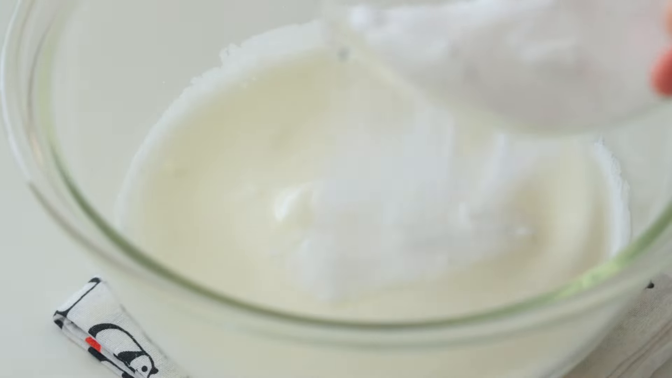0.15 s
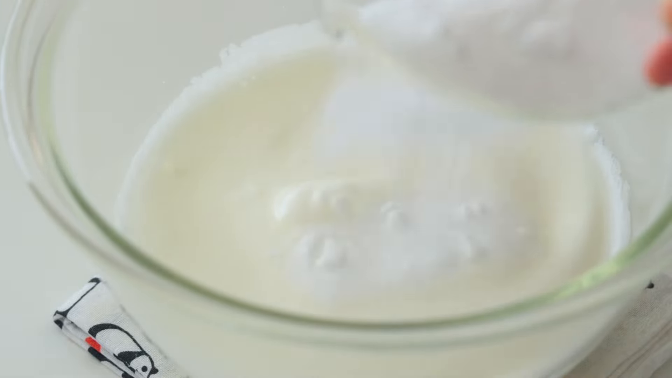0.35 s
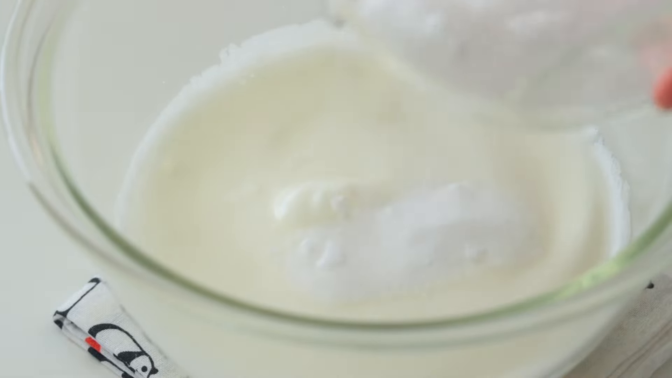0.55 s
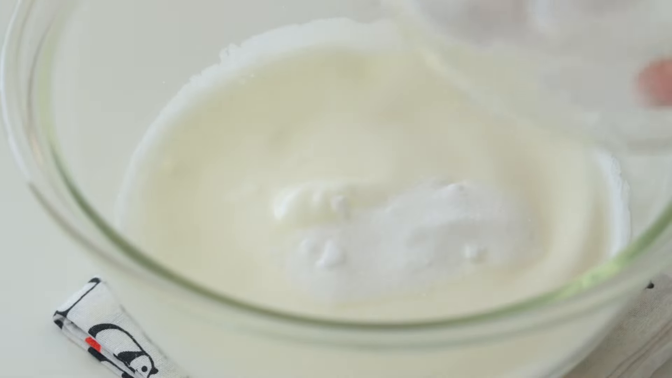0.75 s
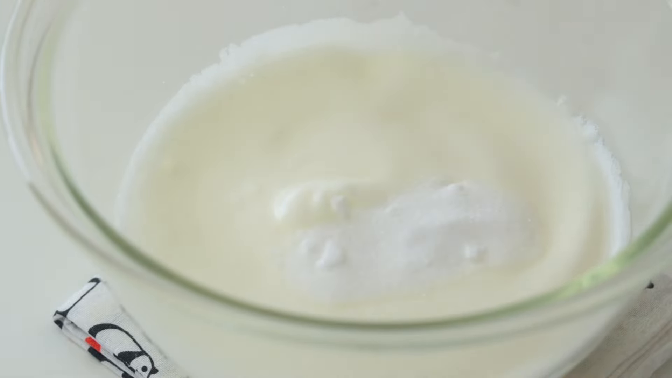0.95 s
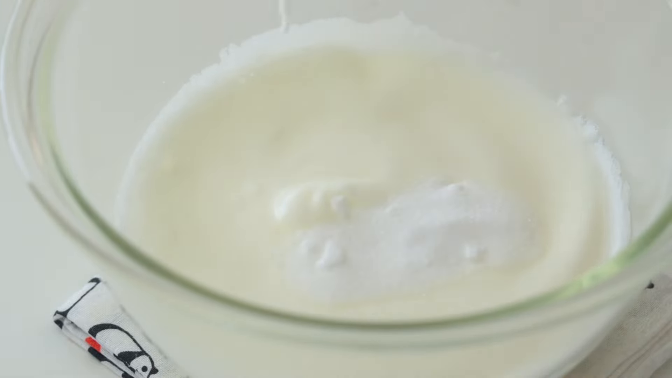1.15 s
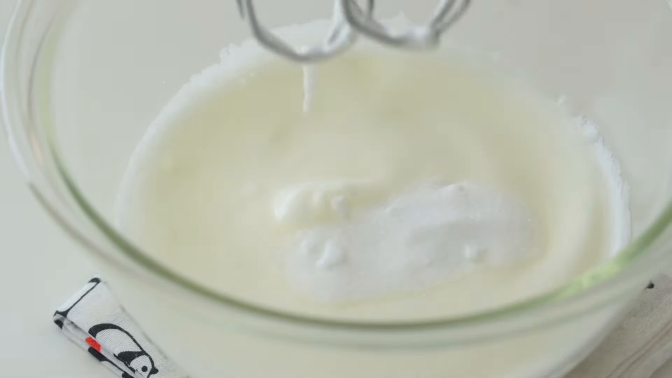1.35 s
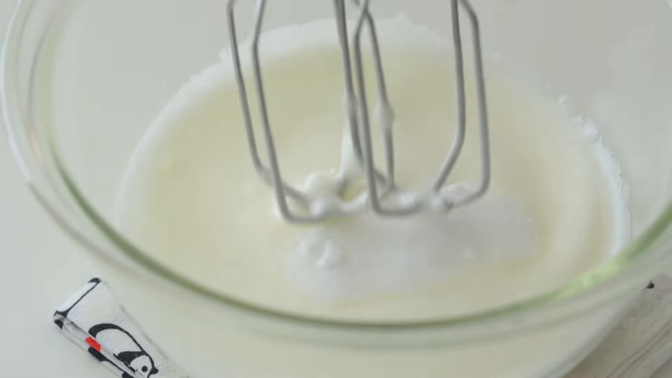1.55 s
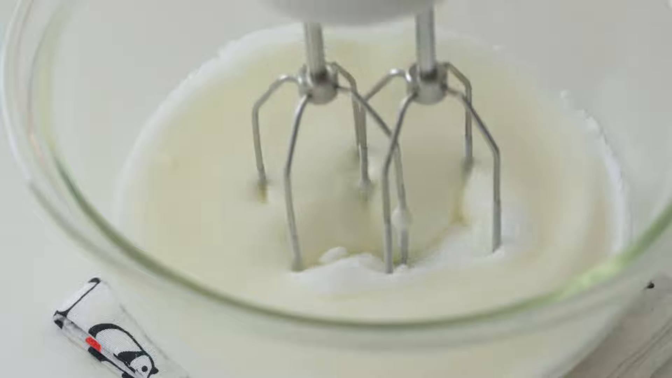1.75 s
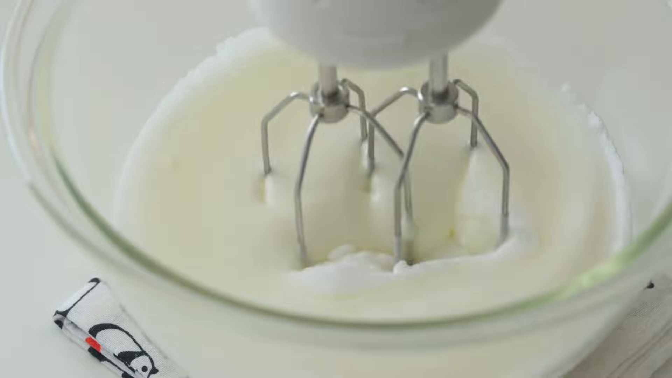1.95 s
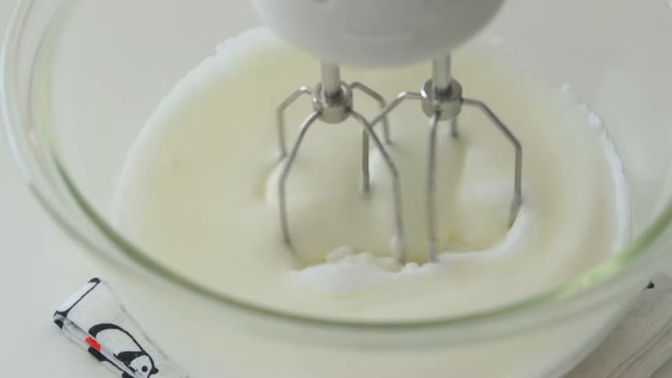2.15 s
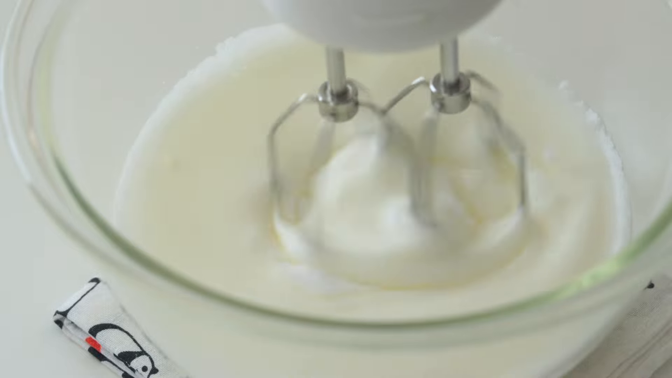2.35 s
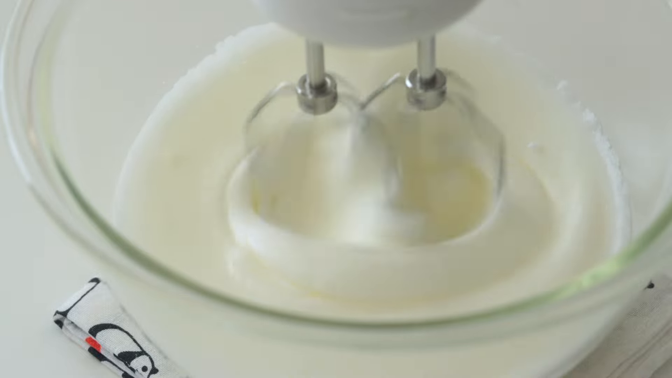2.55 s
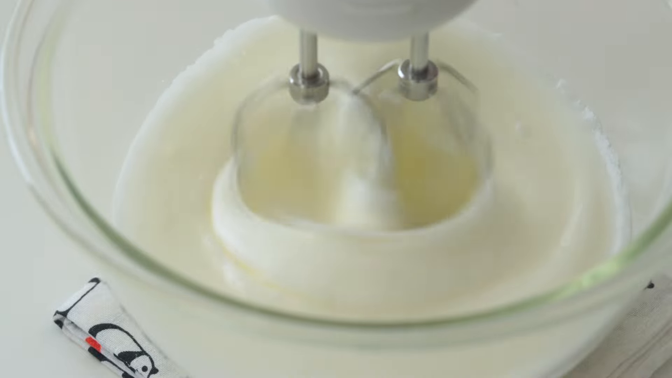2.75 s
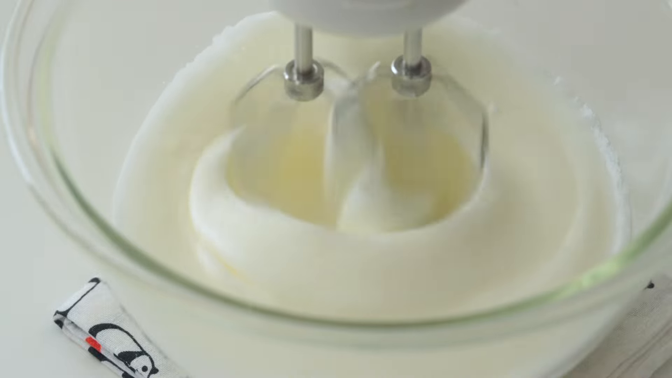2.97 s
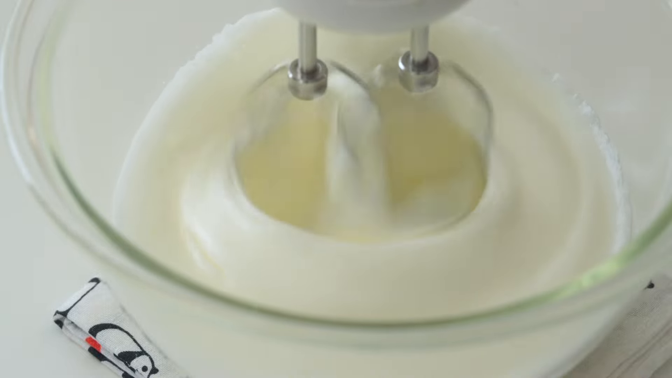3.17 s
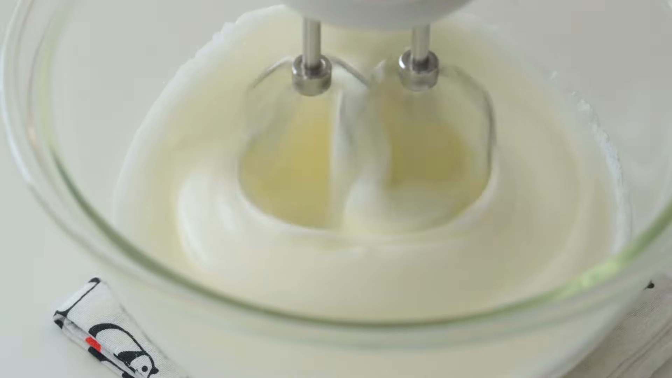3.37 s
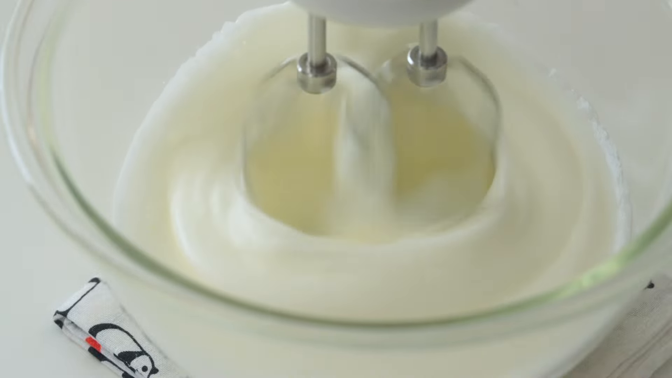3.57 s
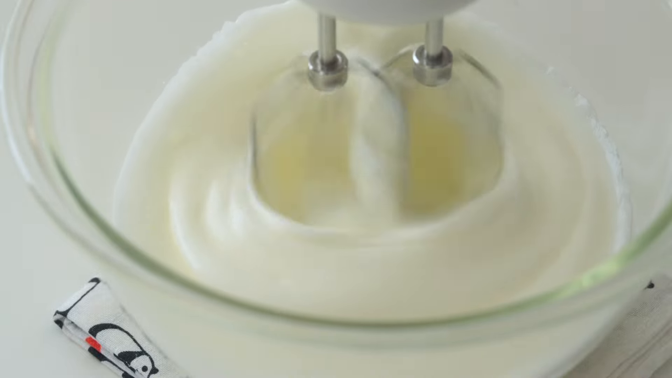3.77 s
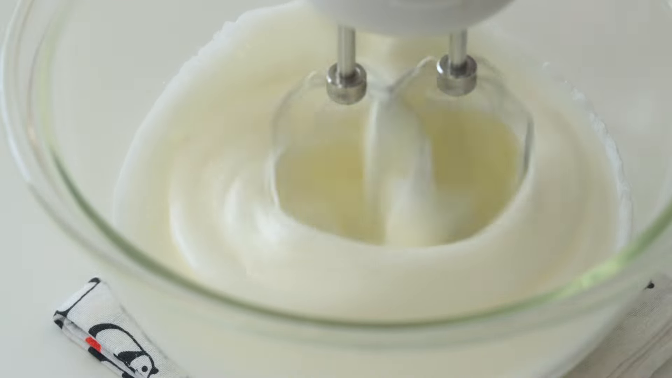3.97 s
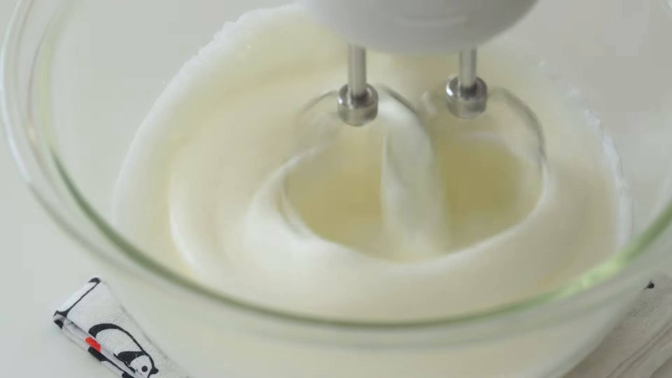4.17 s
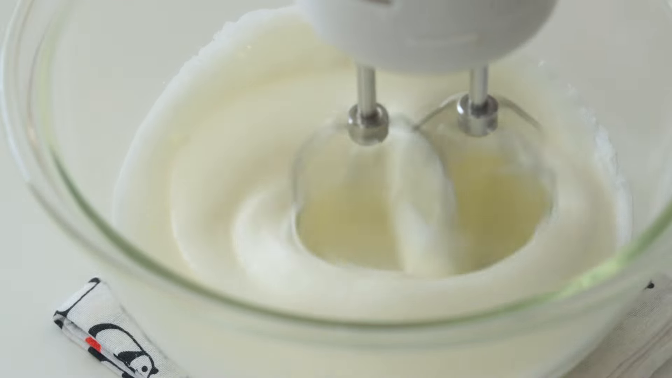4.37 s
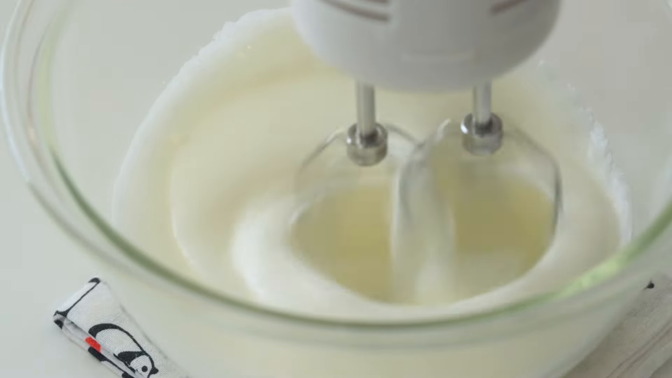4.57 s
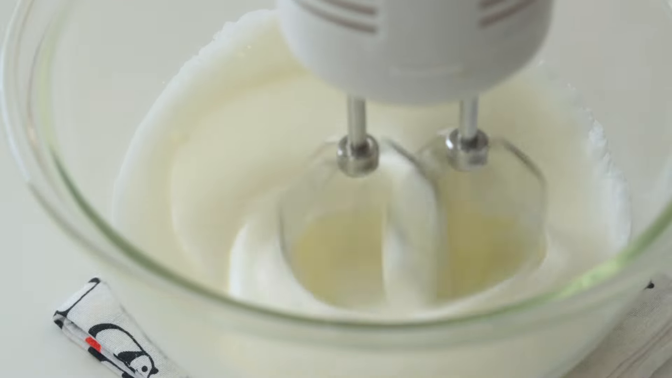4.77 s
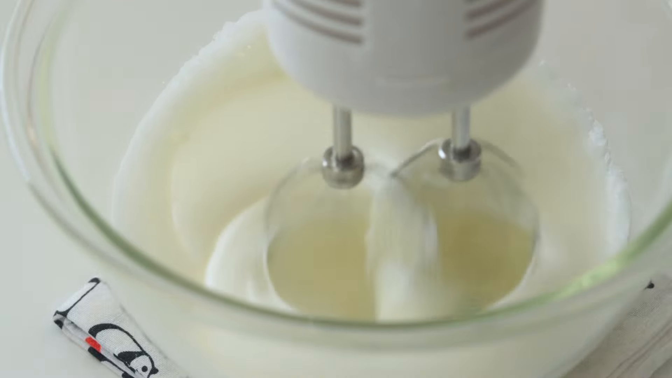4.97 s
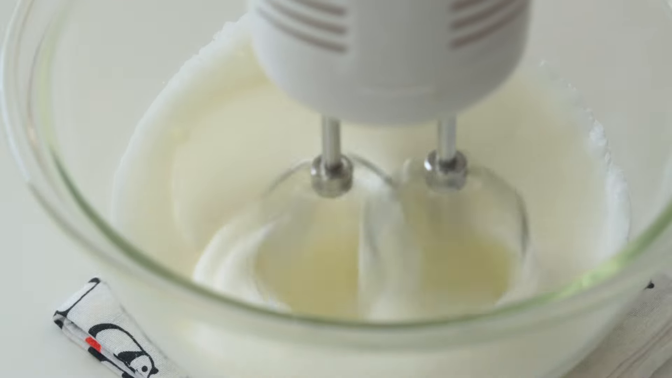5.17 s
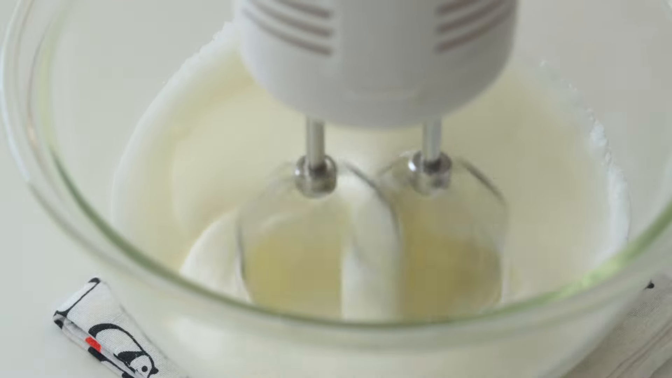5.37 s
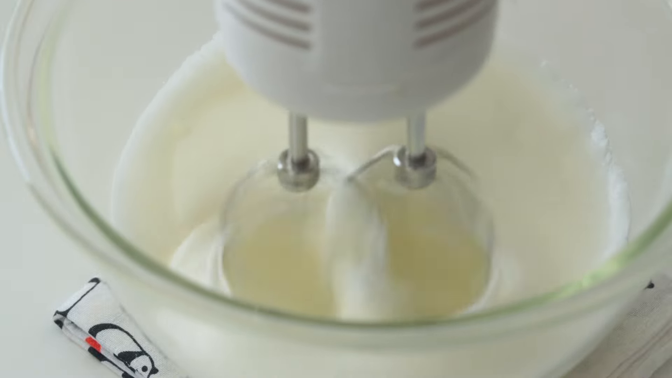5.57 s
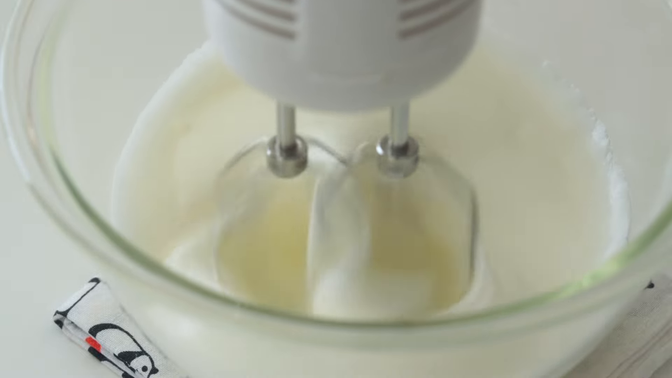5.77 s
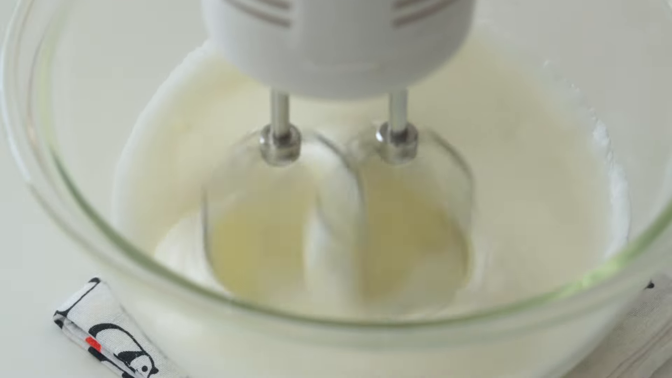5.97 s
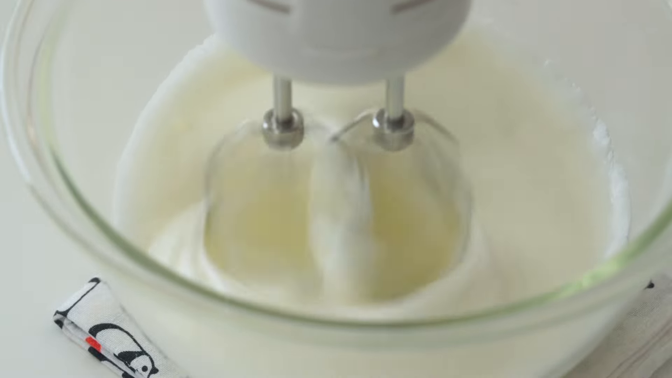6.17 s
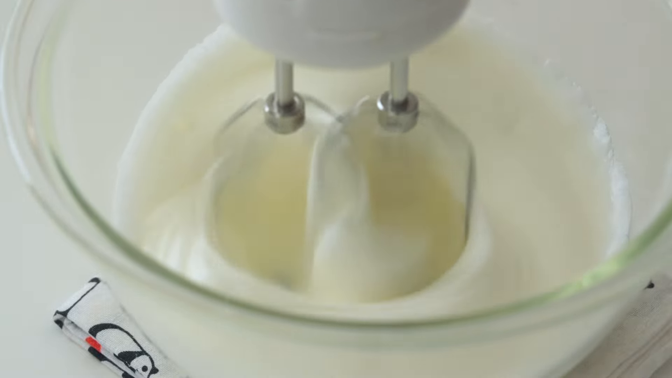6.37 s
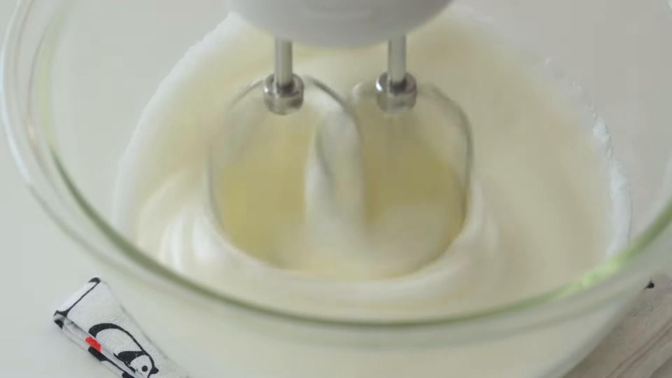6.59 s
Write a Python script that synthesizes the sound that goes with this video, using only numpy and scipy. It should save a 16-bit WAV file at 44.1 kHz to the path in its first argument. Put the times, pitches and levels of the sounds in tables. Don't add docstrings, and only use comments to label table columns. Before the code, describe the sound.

A quiet kitchen heard close up, with soft air noise and faint low appliance hum. From 0 to 0.5 s a cup is tapped quickly and unevenly, with bright clicks, small knocks and dull thuds over a thin trickle of sugar; the last tap is heavy. The trickle fades, and at 1.2 s the background abruptly becomes quieter. Around 1.5-1.9 s there is a faint rustle, then wire beaters tink brightly on glass at 1.87 s, with tiny bounces and a dull scuff. From 2.13 to 2.5 s sharp plastic switch snaps start the mixer: a stuttering growl, hard gear clacks, and a fast rising whine. Another snap at 3.04 s lifts it to full speed. Until 6.6 s it runs loud and steady, a buzzing, piercing whine with gear rattle, foam slosh and airy hiss, its tones gently swelling and fading, with one more click near 4.6 s.

```python
import sys
import numpy as np
from scipy import signal
from scipy.fft import rfft, irfft, next_fast_len
from scipy.io import wavfile
from scipy.ndimage import uniform_filter1d

SR = 44100
rng = np.random.default_rng(int(sys.argv[2]) if len(sys.argv) > 2 else 0)


def convert_level_to_amplitude(level_db):
    exponent = np.asarray(level_db, float) / 20
    return 10 ** exponent


def pcm_store(signal):
    levels = np.round(np.clip(np.atleast_2d(signal), -1, 1) * 32767)
    wavfile.write(sys.argv[1], SR, levels.astype(np.int16).T)


N = 292362
TIME = np.arange(N) / SR

# pitch in Hz, level in dB per Hz.
ROOM_AIR = [(50, -40), (85, -6), (144, -4.5), (209, -6), (290, -4.5), (377, -8), (502, -8), (1320, -17.5),
            (1470, -19), (4900, -24.5), (14700, -27), (16000, -29)]
# pitch in Hz, level in dB per Hz.
QUIET_AIR = [(50, -40), (85, -13), (290, -10.5), (353, -12), (403, -7), (560, -15.5), (906, -16.5),
             (2080, -24.5), (3530, -23), (6370, -31), (15000, -33), (16000, -33)]
ROOM_AIR_DB, QUIET_AIR_DB = -61, -72
CHANGE_S, CHANGE_DB = 1.206, -14
# pitch in Hz, level in dB.
HUM = [(53.8, -63), (145.3, -77.5), (242.2, -71.5), (290.7, -71.5)]
# time in seconds, level in dB.
POUR = [(0, -57), (.06, -73), (.1, -67), (.17, -68), (.3, -70), (.36, -64), (.42, -73), (.8, -78),
        (1.2, -70)]
FOAM_S, FOAM_RISE_S, FOAM_HOLD_S, FOAM_FALL_S, FOAM_DB = 1.49, 0.14, 0.14, 0.12, -76.5

# start in seconds, level in dB, pitch in Hz.
CUP_CLICKS = [(0.0014, -55, 3700), (0.0204, -48, 3690), (0.0334, -55, 2720), (0.1057, -47, 9860),
              (0.194, -44.5, 4440), (0.2094, -56.5, 3080), (0.246, -43, 4400), (0.3387, -46, 8450),
              (0.3538, -41, 4320), (0.3635, -37.5, 4390), (0.3708, -54, 3880), (0.495, -46, 3530),
              (1.2446, -61, 3680), (1.608, -63, 2610), (2.001, -53, 2340)]
# start in seconds, thud in dB, knock in dB, rim in dB, knock pitch in Hz.
KNOCKS = [(0.0014, -50.5, -51.5, -69, 633), (0.0334, -52, -60, -65, 514),
          (0.1054, -54, -56.5, -68, 479), (0.1931, -57, -53, -72, 412), (0.2091, -61, -50, -72, 610),
          (0.2132, -49, -45, -72, 420), (0.246, -61, -59, -64, 439), (0.3387, -45, -42, -54, 646),
          (0.3646, -56, -55, -66, 649), (0.3708, -47, -52, -66, 382),
          (0.4946, -39.5, -52.5, -51.5, 382), (1.608, -67, -64.5, -69, 431),
          (2.001, -63, -74, -69, 479), (2.0485, -75, -78, -63, 479), (2.1354, -60, -47.5, -55, 560)]

# start in seconds, peak in dB.
TINKS = [
    (1.8702, -42.5),
    (1.92, -61),
    (1.9455, -64),
    (2.0475, -58),
]
# pitch in Hz, level in dB, time to fade by 60 dB in seconds.
BEATER = [(3950, -6, 0.028), (4930, -4, 0.03), (5146, -5, 0.028), (7607, -24, 0.15), (8650, -5, 0.53),
          (9232, -13, 0.13), (9647, 2.5, 0.046), (11030, -9, 0.049), (11710, -5, 0.068), (13220, -14, 0.16)]
# time in seconds, level in dB.
SETTLE = [(1.862, -100), (1.872, -50), (1.9, -62), (1.95, -63), (2.0, -67), (2.04, -70), (2.1, -82)]
# time in seconds, level in dB.
RUMBLE = [(2.1, -66), (2.5, -60), (3.2, -51.5), (3.7, -63), (4.2, -53.5), (4.8, -51.5), (5.5, -48.5),
          (6.63, -50)]
# start in seconds, peak in dB, then body and jolt in dB relative to the peak.
SWITCH = [(2.1333, -33.5, -7, -27), (2.182, -28.5, -10, -39), (2.1884, -43, -12, -23),
          (2.275, -32, -18, -43), (2.2809, -18.5, -15, -47), (2.3003, -36, 5, -34), (2.32, -28, -8, -40),
          (2.397, -30, -9, -11), (2.5004, -19.5, -19, -38), (3.039, -23, -11, -25), (4.5697, -31, -6, -31)]

RIPPLE_HZ = 120
# time in seconds, shaft speed in Hz the motor heads for.
NOTCHES = [
    (2.134, 122),
    (2.3, 188),
    (2.3974, 228.5),
    (3.045, 259.3),
]
SPIN_UP_S = 0.225
ENGAGE_S, BREAK_S, BREAK_WIDTH_S = 2.14, 2.307, 0.085
STALL_DB = -4.5
# time in seconds, drag of the foam on the shaft in Hz.
HAND_DRAG = [(2.3, 0), (3.0, .9), (3.22, .4), (3.42, .3), (3.62, .7), (3.77, .9), (4.08, .2), (4.4, .5),
             (4.71, .7), (5.03, .7), (5.34, 1.2), (5.66, 1.1), (5.97, .7), (6.29, .4), (6.6, .4)]
# time in seconds, length in cm.
BOWL_PATH = [(2.3, 5.2), (3.0, 8.3), (3.22, 6), (3.42, 2.6), (3.62, 5.65), (3.77, 5.5), (4.08, 5.3),
             (4.4, 6.01), (4.71, 6.26), (5.03, 4.69), (5.2, 3.9), (5.34, 3.84), (5.5, 3.6), (5.66, 2.8),
             (5.97, 1.9), (6.29, 1.06), (6.6, .18)]

# pitch in Hz, gain in dB.
SHELL = [(1850, 2), (2165, 6), (2460, -5), (2570, -11), (2780, -2), (4250, 5.5), (5900, -7.5), (7700, 7.5),
         (8700, 7.5), (13500, 6.5)]
# pitch in Hz, width in Hz, gain in dB.
PANELS = [(970, 77, -3), (1220, 90, 3), (1350, 40, -12), (1660, 170, 3), (1915, 52, -14), (2420, 35, -12),
          (2794, 46, 2), (3063, 19.4, -7), (3135, 22, -8), (3420, 157, 4.5), (4493, 100, -13),
          (5470, 70, -10), (5740, 39, -8), (8200, 150, -10)]
# pitch in Hz, width in Hz, level in dB.
HOUSING = [(362, 40, -3), (622, 73, -1.5), (740, 82, 1.5), (850, 40, 0), (982, 60, -7), (1263, 72, 2.5),
           (1390, 98, 3), (1492, 73, 6), (1662, 54, 3), (2050, 150, -2.5), (2600, 390, -13.5)]

UNBALANCE_DB, UNBALANCE_DB_PER_DECADE = -45.5, 16
BARS_DB = [-39, -37.5, -43, -44.5, -48, -58]
BARS_START_DB, SIDES_DB_PER_DECADE = -25, 8
MIRRORS = [(0.58, 0.76), (0.6, 0.34), (0.65, .304), (0.07, 0.32), (0.03, .013), (0.42, 0.068)]
BOUNCES = [2, 1, 1, 1, 1, 1]
MIRROR_HZ = 2950
TABLE_M, TABLE_SHARE, TABLE_TURNS = 0.46, 0.256, 0.379
RADIATES_HZ = 1010
VENT_HZ, VENT_WIDTH_HZ, VENT_DB = 12600, 470, 10.5
# pitch reached in Hz, level in dB.
UPPER_BARS = [(3000, -66), (7000, -66), (10000, -61), (13000, -51.5), (14500, -66), (15500, -62),
              (16200, -110)]
ORDERS = [(0, 3), (2, 0), (5, 0), (8, 0), (10, 0), (11, -2), (11, -1), (12, -2), (12, 2), (13, -1), (13, 0),
          (14, 0), (16, 0), (18, 0), (24, -1), (24, 1), (32, 0), (33, 0), (35, 0), (36, -1), (36, 1),
          (37, 0), (38, 0), (41, 0), (42, 0), (47, 0), (48, -1), (49, 0), (3, 0), (20, 0), (23, 0),
          (14, -1)]
ORDERS_DB = [-60.5, -58, -51, -54, -55.5, -56, -55, -52, -56, -52.5, -53.5, -56, -55.5, -54.5, -61.5, -58,
             -67, -60, -53, -54, -50.5, -60, -62, -58, -62, -54, -55, -56, -59.5, -67, -66, -63]
# time in seconds, left minus right in dB.
SHRILL = [(3.4, -2), (3.57, -15), (3.79, -1), (3.91, -7), (4.1, 1), (4.28, -7), (4.5, -2), (4.77, -12.0),
          (5.42, -13), (5.64, 1), (5.94, 0.0), (6.21, -14), (6.63, -1)]
SHRILL_LEAD = 0.95

# full speed in dB, dB per decade of speed, change at the start in dB, jerk in dB.
LAYERS = [
    (2, 19.5, 1, -2.5),
    (-0.53, 14.5, 4.5, 13),
    (0.95, 27, 5, 10.5),
    (0.6, 25, -15, 8),
]
LOCK_DB, LOCK_WIDTH_HZ = 4, 7
# pitch in Hz, level in dB per Hz.
SLOSH = [(40, -100), (70, -96), (170, -78.5), (300, -84.5), (600, -76), (950, -86), (1500, -80),
         (2050, -76), (2400, -81.5), (3000, -85.5), (4000, -110)]
# pitch in Hz, level in dB per Hz.
BRUSH = [(1500, -110), (2400, -80), (3200, -79), (3800, -84), (4250, -80.5), (4900, -83.5), (5600, -89.5),
         (6500, -91.5), (7500, -110)]
# pitch in Hz, level in dB per Hz.
FAN = [(5500, -110), (7300, -87.5), (8400, -80.5), (9700, -80), (11100, -85.5), (12800, -82), (13400, -91),
       (14500, -97), (15700, -99), (16000, -130)]
# start in seconds, peak in dB.
CLACKS = [(2.209, -34), (2.226, -33), (2.236, -33), (2.242, -30), (2.251, -34), (2.301, -25), (2.326, -20),
          (2.333, -25), (2.366, -26), (2.375, -31), (2.384, -27), (2.433, -27), (2.706, -29), (2.731, -30),
          (2.756, -30), (2.781, -31), (2.814, -33), (2.847, -29), (2.879, -30), (2.915, -33), (2.964, -32),
          (3.015, -27), (3.116, -30), (3.279, -28), (3.546, -30), (4.556, -25)]

# pitch in Hz, left minus right in dB.
PORTS = [(60, -2.0), (110, -2.5), (200, -3.5), (380, -2.5), (700, -2.0), (1290, -0.5), (2380, -2.5),
         (4400, -1.0), (8120, 0.0), (15000, -4.0)]
# pitch in Hz, gain in dB.
PORT_DIP = [(100, 0), (4600, -0.5), (6300, -4.5), (8000, -0.5), (12000, -3), (15800, 1), (16500, -30)]
# pitch in Hz, gain in dB.
ECHO_COLOUR = [(100, 0.5), (1000, -1.5), (2500, 1.5), (5000, 3), (9000, 1.5)]
ECHO_T60_S, ECHO_DB = 0.44, -10.5


def colour(x, points):
    size = next_fast_len(N)
    hz, db = np.transpose(points)
    bins_hz = np.arange(size // 2 + 1) * SR / size
    gain = convert_level_to_amplitude(np.interp(np.log(bins_hz + 1), np.log(hz), db))
    return irfft(rfft(x, size) * gain, size)[..., :N]


def hiss(points):
    return colour(rng.standard_normal(N), points) * np.sqrt(SR / 2)


def walk(rate):
    size = int(SR / rate)
    steps = np.repeat(rng.standard_normal(N // size + 1), size)
    drift = uniform_filter1d(steps, size)[:N]
    return drift / drift.std()


def curve(table):
    s, value = np.transpose(table)
    return np.interp(TIME, s, value)


def add(out, s, x):
    i = int(s * SR)
    out[i:i + len(x)] += x[:N - i]


def ring(hz, t60, rough=0., rise_s=0.00015):
    t = np.arange(int(t60 * SR) + 8) / SR
    grit = signal.lfilter(*signal.iirpeak(hz, 2.2, SR), rng.standard_normal(len(t)))
    fade = (1 - np.exp(-t / rise_s)) * np.exp(-np.log(1000) * t / t60)
    return fade * (np.sin(2 * np.pi * hz * t) + rough * grit / grit.std())


def room_air(points, db, width):
    mid = convert_level_to_amplitude(0.57 * walk(7.8)) * hiss(points)
    side = convert_level_to_amplitude(0.57 * walk(7.8)) * hiss(points)
    return np.array([mid + width * side, mid - width * side]) * convert_level_to_amplitude(db) / mid.std()


def kitchen():
    after = np.interp(TIME, [CHANGE_S - 0.004, CHANGE_S + 0.004], [0, 1])
    out = (1 - after) * room_air(ROOM_AIR, ROOM_AIR_DB, 0.78) + after * room_air(QUIET_AIR, QUIET_AIR_DB, 0.43)
    drift = np.cumsum(1 + 0.0197 * walk(4.7)) / SR
    for hz, db in HUM:
        hum = np.sqrt(2) * convert_level_to_amplitude(db + 2.0 * walk(5.05)) * np.sin(2 * np.pi * hz * drift)
        out += hum * convert_level_to_amplitude(CHANGE_DB * after)
    grains = hiss([(2500, -6), (4000, -1.5), (6000, -10), (9000, -2), (12000, -4), (15000, -33)])
    foam = np.interp(TIME, np.cumsum([FOAM_S, FOAM_RISE_S, FOAM_HOLD_S, FOAM_FALL_S]), [0, 1, 1, 0])
    rustle = (1 - after) * convert_level_to_amplitude(curve(POUR)) + foam * convert_level_to_amplitude(FOAM_DB)
    return out + grains / grains.std() * rustle * convert_level_to_amplitude(1.5 * walk(40.2))


def taps():
    out = np.zeros(N)
    for s, db, click_hz in CUP_CLICKS:
        add(out, s, convert_level_to_amplitude(db - 5.0) * ring(click_hz, 0.014, rough=0.91))
        add(out, s, convert_level_to_amplitude(db - 17.5) * ring(9900, 0.016, rough=2.7))
    for s, thud_db, knock_db, rim_db, knock_hz in KNOCKS:
        add(out, s, convert_level_to_amplitude(rim_db + 8.0) * ring(1470, 0.016, rough=0.27))
        add(out, s, convert_level_to_amplitude(knock_db + 7.5) * ring(knock_hz, 0.017, rough=0.36))
        add(out, s + 0.0019, convert_level_to_amplitude(thud_db) * ring(162, 0.11, rise_s=0.0015))
    return out


def tinks():
    out = np.zeros(N)
    for s, db in TINKS:
        for hz, mode_db, t60 in BEATER:
            strength = convert_level_to_amplitude(db + mode_db - 13.0 + 2 * rng.standard_normal())
            add(out, s, strength * ring(hz, min(t60, 0.09), rough=0.31))
        add(out, s, convert_level_to_amplitude(db - 23) * ring(1540, 0.017, rough=2.1))
        add(out, s, convert_level_to_amplitude(db - 8.0) * ring(810, 0.03, rough=0.4))
    scuff = hiss([(30, -22), (60, 3), (160, -4.5), (400, -13), (800, -29), (2000, -48)])
    return out + convert_level_to_amplitude(curve(SETTLE) + 2.5 * walk(30.1)) * scuff / scuff.std()


def rumble():
    shake = hiss([(30, -39), (50, -14), (70, -5.5), (100, -10), (140, -31), (250, -44)])
    return convert_level_to_amplitude(curve(RUMBLE) + 2 * walk(6)) * shake / shake.std() * np.array([[0.7], [-1.2]])


def switch():
    snap, body = np.zeros((2, N))
    for s, db, body_db, jolt_db in SWITCH:
        add(snap, s, convert_level_to_amplitude(db - 16) * ring(9200, 0.019, rough=4.5))
        add(body, s, convert_level_to_amplitude(db + body_db - 7.5) * ring(1766, 0.032, rough=2.6))
        add(body, s, convert_level_to_amplitude(db + jolt_db + 3.0) * ring(152, 0.08, rise_s=0.003))
    plastic = [(2500, -1), (4800, 6.5), (6300, -5.0), (9000, -1.0), (12000, -3.0), (15000, -7), (16500, -30)]
    return colour(snap, plastic) + body


def shaft():
    s, hz = np.transpose(NOTCHES)
    goal = np.r_[0, hz][np.searchsorted(s, TIME)]
    keep = np.exp(-1 / (SPIN_UP_S * SR))
    return np.maximum(signal.lfilter([1 - keep], [1, -keep], goal) - curve(HAND_DRAG), 8)


def shell(hz):
    shell_hz, shell_db = np.transpose(SHELL)
    broad = np.interp(np.log(hz + 1), np.log(shell_hz), shell_db)
    return broad + sum(db * np.exp(-((hz - centre_hz) / width) ** 2) for centre_hz, width, db in PANELS)


def bar_levels(shaft_hz, waiting):
    path_s = curve(BOWL_PATH) / 34300
    speed = np.log10(shaft_hz / shaft_hz.max())
    main = [(12, -1), (12, 0), (12, 1), (24, 0), (36, 0), (48, 0)]
    levels = [UNBALANCE_DB + UNBALANCE_DB_PER_DECADE * speed]
    for (order, ripple), db, (share, phase), bounces in zip(main, BARS_DB, MIRRORS, BOUNCES):
        hz = np.abs(order * shaft_hz + ripple * RIPPLE_HZ) + 1
        bowl_share = share * np.minimum(hz / MIRROR_HZ, 1) ** 3
        mirror = np.abs(1 + bowl_share * np.exp(2j * np.pi * (hz * path_s * bounces + phase)))
        mirror *= np.abs(1 + TABLE_SHARE * np.exp(2j * np.pi * (hz * TABLE_M / 343 + TABLE_TURNS)))
        level = db + shell(hz) + abs(ripple) * SIDES_DB_PER_DECADE * speed
        level += VENT_DB / (1 + ((hz - VENT_HZ) / VENT_WIDTH_HZ) ** 2)
        level -= 20 * np.log10(1 + (RADIATES_HZ / hz) ** 2)
        level += 20 * np.log10(mirror) + BARS_START_DB * waiting
        levels.append(level)
    return levels


def tone(turns, order, ripple, db, flutter_db, lead=0.):
    phase = 2 * np.pi * (order * turns + ripple * RIPPLE_HZ * TIME + rng.random())
    return np.sqrt(2) * convert_level_to_amplitude(db + flutter_db * walk(45)) * np.sin(phase + lead)


def whine(turns, shaft_hz, levels):
    main = [(1, 0), (12, -1), (12, 0), (12, 1), (24, 0), (36, 0)]
    speed = np.log10(shaft_hz / shaft_hz.max())
    flutter_db = 0.7 + 3 * (1 - shaft_hz / shaft_hz.max())
    shake_db = levels[0] - 18 * (shaft_hz < 166)
    out = np.zeros(N)
    for (order, ripple), db in zip(main, [shake_db] + levels[1:]):
        out += tone(turns, order, ripple, db, flutter_db)
    for order in (60, 72, 84):
        out += tone(turns, order, 0, np.interp(order * shaft_hz, *np.transpose(UPPER_BARS)), 2.8)
    for (order, ripple), db in zip(ORDERS, ORDERS_DB):
        gain_db = shell(np.abs(order * shaft_hz + ripple * RIPPLE_HZ))
        growth = 90 if order < 11.5 and order != 3 else 12
        out += tone(turns, order, ripple, db + growth * speed + 0.63 * (gain_db - gain_db[-1]), 1.93)
    return out


def housing(force):
    out = convert_level_to_amplitude(-14) * signal.lfilter(*signal.iirpeak(1500, 1.1, SR), force)
    for k, (hz, width, db) in enumerate(HOUSING):
        out = out + (-1) ** k * convert_level_to_amplitude(db) * signal.lfilter(*signal.iirpeak(hz, hz / width, SR), force)
    return out


def gears(turns):
    slip, jitter_s, scatter_db = 0.2, 0.00004, 1.5
    beat = (np.arange(1, int(N / SR * RIPPLE_HZ)) - 0.05) / RIPPLE_HZ
    late, hard = rng.standard_normal((2, len(beat)))
    angle = np.interp(beat, TIME, turns) % 1
    knock_s = beat - slip * angle / RIPPLE_HZ + jitter_s * late
    place = np.clip(knock_s * SR, 0, N - 1).astype(int)
    force = np.exp(0.7 * np.cos(2 * np.pi * angle - 0.8))
    body = housing(np.bincount(place, force * convert_level_to_amplitude(scatter_db * hard), N))
    return convert_level_to_amplitude(-43.5) * body / body.std()


def scrape(turns):
    surface = irfft(np.exp(2j * np.pi * rng.random(61)), 2048)
    worn = np.interp(turns % 1 * 2048, np.arange(2048), surface / surface.std())
    return worn * np.sqrt(SR / 2)


def mixer():
    shaft_hz = shaft()
    speed = np.log10(shaft_hz / shaft_hz.max())
    waiting = np.clip((BREAK_S - TIME) / (BREAK_S - ENGAGE_S), 0, 1)
    jerk = np.exp(-((TIME - BREAK_S) / BREAK_WIDTH_S) ** 2)
    levels = bar_levels(shaft_hz, waiting)
    unsteady = 0.028 * (1 - shaft_hz / shaft_hz.max()) ** 2
    turns = np.cumsum(shaft_hz * (1 + 0.00025 * walk(30) + unsteady * walk(70))) / SR
    slosh_db, gear_db, brush_db, fan_db = (db + slope_db * speed + start_db * waiting + jerk_db * jerk
                                           for db, slope_db, start_db, jerk_db in LAYERS)
    gear_db += LOCK_DB * np.exp(-((shaft_hz - 2 * RIPPLE_HZ) / LOCK_WIDTH_HZ) ** 2)

    turn, ripple = np.cos(2 * np.pi * turns), np.cos(2 * np.pi * RIPPLE_HZ * TIME)
    throb = np.cos(2 * np.pi * (turns - 2 * RIPPLE_HZ * TIME))
    worn = 0.55 * scrape(turns)
    brush = (1 + 0.34 * turn) * hiss(BRUSH) + colour(worn, BRUSH)
    fan = (1 + 0.17 * turn) * hiss(FAN) + colour(worn, FAN)
    out = whine(turns, shaft_hz, levels) + convert_level_to_amplitude(gear_db) * gears(turns)
    out += convert_level_to_amplitude(slosh_db + 0.83 * walk(20)) * (1 + 0.38 * ripple) * (1 + 0.16 * throb) * hiss(SLOSH)
    out += convert_level_to_amplitude(brush_db + 0.7 * walk(9)) * (1 + 0.16 * ripple) * brush
    out += convert_level_to_amplitude(fan_db + 1.0 * walk(9)) * (1 + 0.19 * ripple) * fan

    sides = np.array([[0.5], [-0.5]])
    shrill_db = levels[-1] + sides * curve(SHRILL)
    shrill = tone(turns, order=48, ripple=0, db=shrill_db, flutter_db=1.1, lead=sides * SHRILL_LEAD)
    running = (TIME > SWITCH[0][0]) * convert_level_to_amplitude(STALL_DB * (TIME < SWITCH[1][0]))
    return out * running, shrill * running


def clacks():
    out, blow = np.zeros(N), housing(signal.unit_impulse(SR // 20))
    for s, db in CLACKS:
        add(out, s, convert_level_to_amplitude(db) * blow / np.abs(blow).max())
    return out


def kitchen_echo(near):
    t = np.arange(int(0.3 * SR)) / SR
    echo = rng.standard_normal((2, len(t))) * np.exp(-np.log(1000) * t / ECHO_T60_S) * (t > 0.002)
    echo *= convert_level_to_amplitude(ECHO_DB) / np.sqrt(np.sum(echo ** 2, axis=1, keepdims=True))
    return colour(signal.fftconvolve(near[None], echo, axes=1)[:, :N], ECHO_COLOUR)


def scene():
    motor, shrill = mixer()
    near = motor + colour(taps() + tinks(), PORT_DIP) + switch() + clacks()
    direct = [colour(near, [(hz, sign * db / 2) for hz, db in PORTS]) for sign in (1, -1)]
    background = colour(kitchen(), PORT_DIP) + rumble()
    return np.array(direct) + kitchen_echo(near) + shrill + background


def top_cut(x):
    return signal.sosfilt(signal.butter(12, 15930, fs=SR, output="sos"), x)


def record(dry):
    top = signal.butter(12, 16300, fs=SR, output="sos")
    mix = signal.sosfilt(top, dry)
    return top_cut(mix)


dry = scene()
out = record(dry)
pcm_store(out)
```